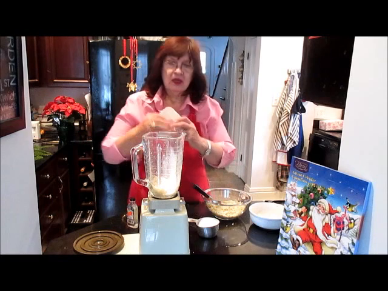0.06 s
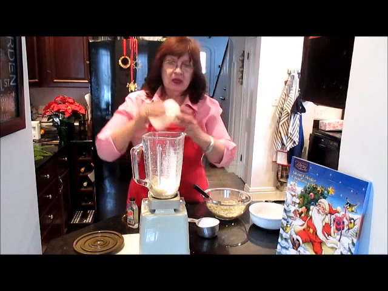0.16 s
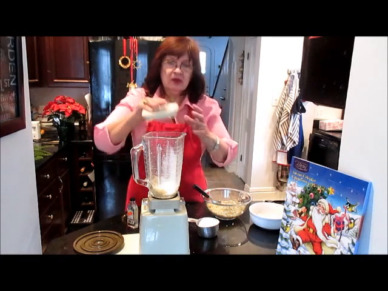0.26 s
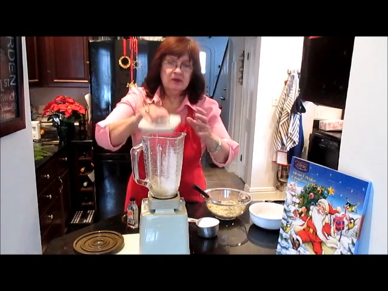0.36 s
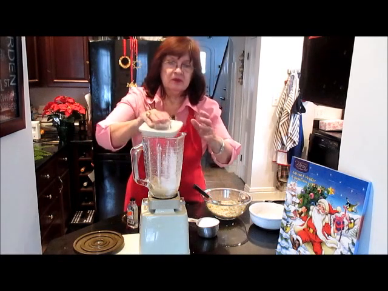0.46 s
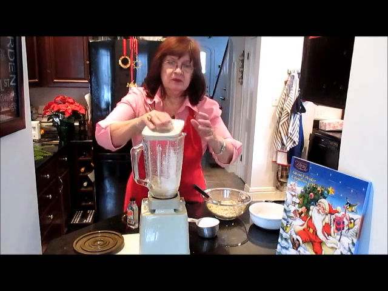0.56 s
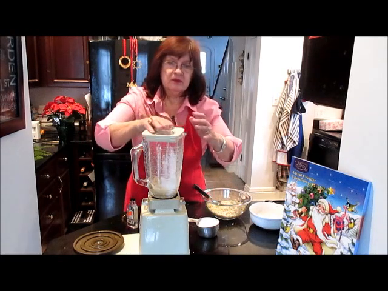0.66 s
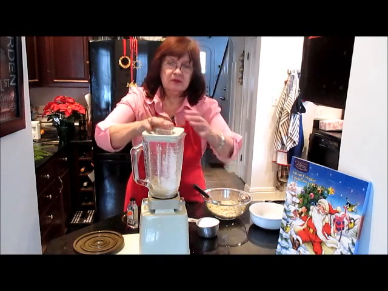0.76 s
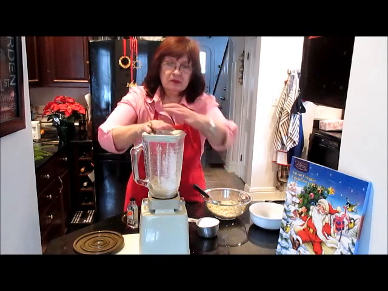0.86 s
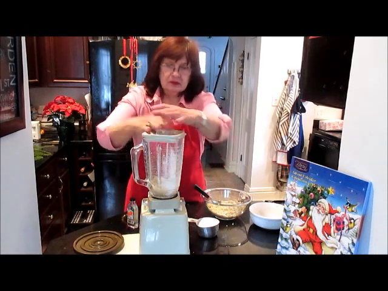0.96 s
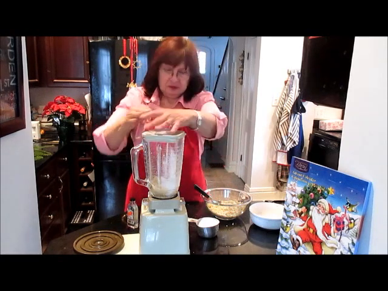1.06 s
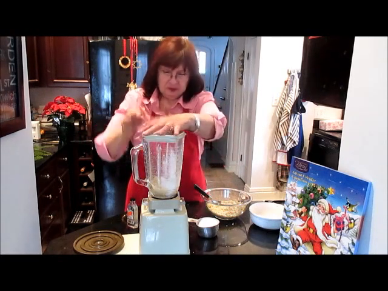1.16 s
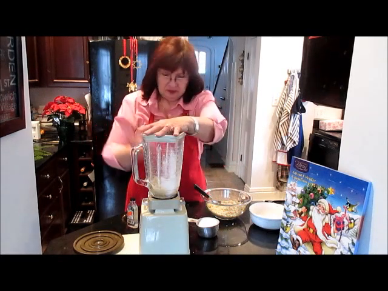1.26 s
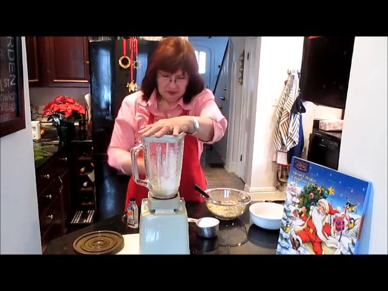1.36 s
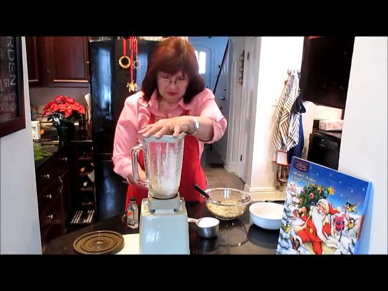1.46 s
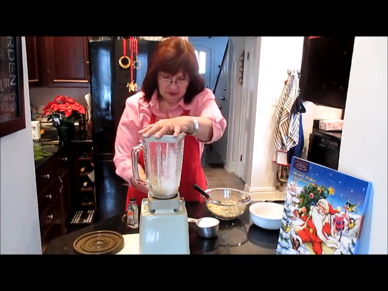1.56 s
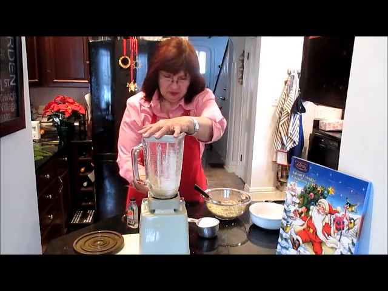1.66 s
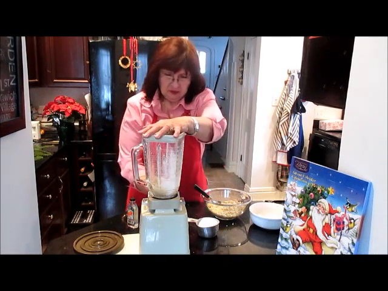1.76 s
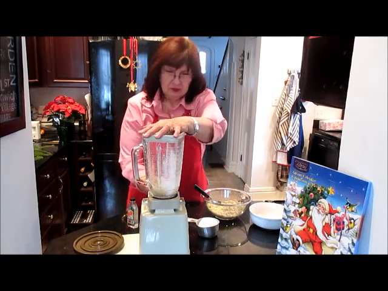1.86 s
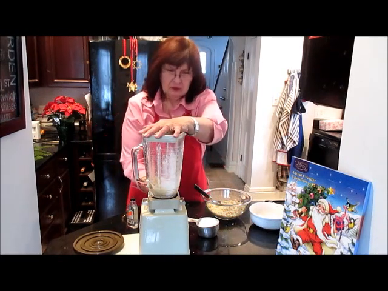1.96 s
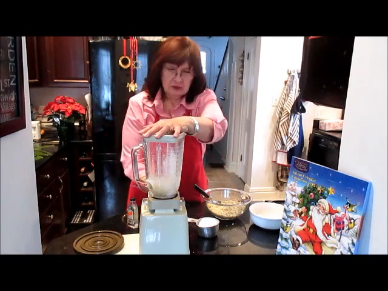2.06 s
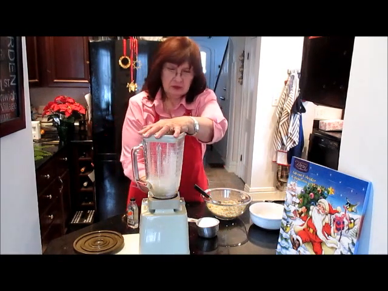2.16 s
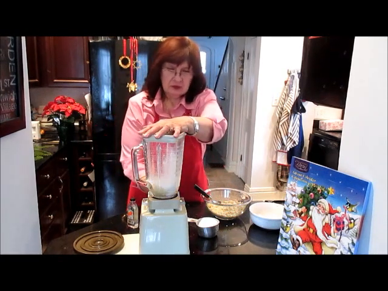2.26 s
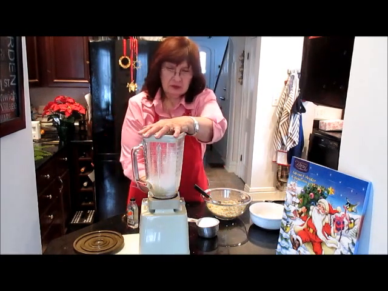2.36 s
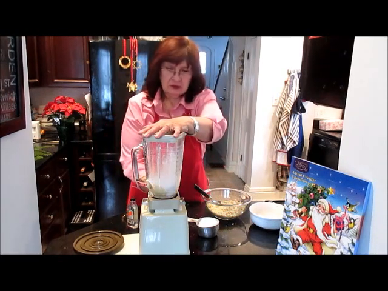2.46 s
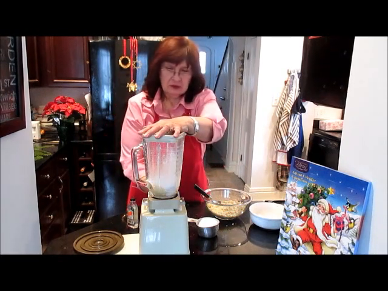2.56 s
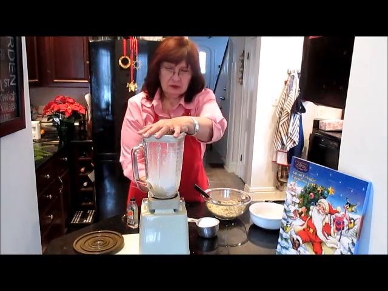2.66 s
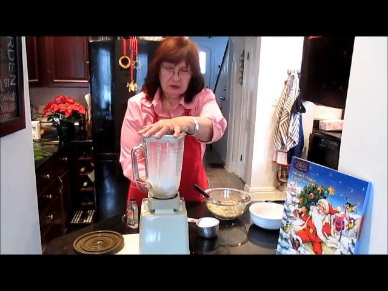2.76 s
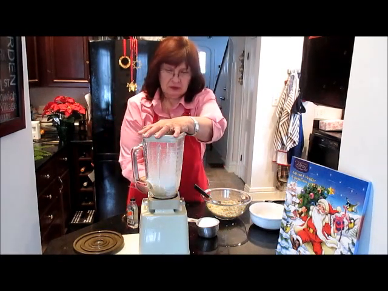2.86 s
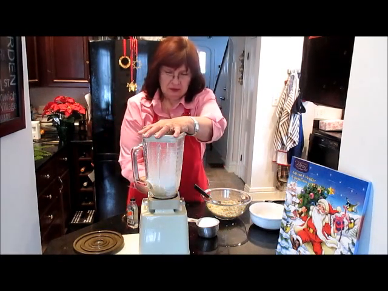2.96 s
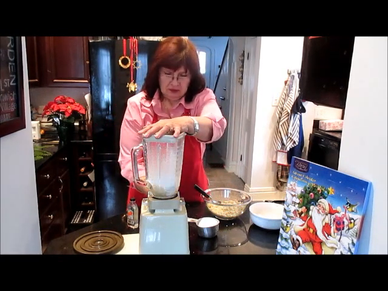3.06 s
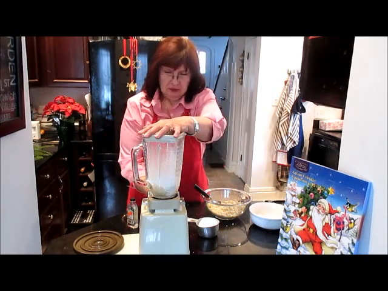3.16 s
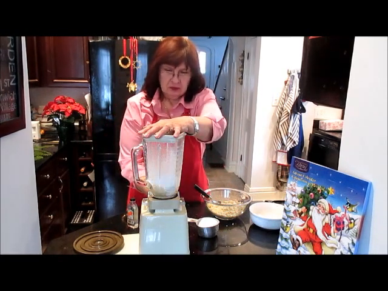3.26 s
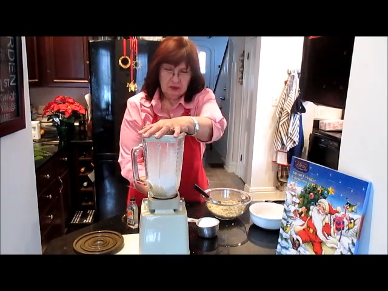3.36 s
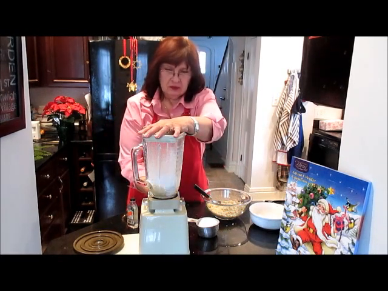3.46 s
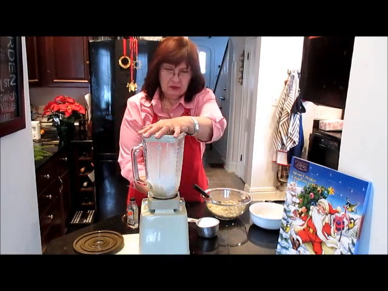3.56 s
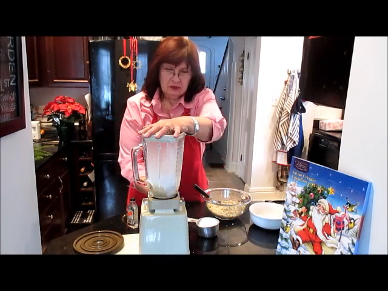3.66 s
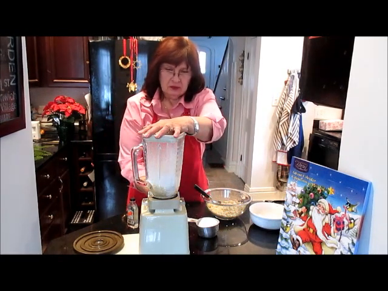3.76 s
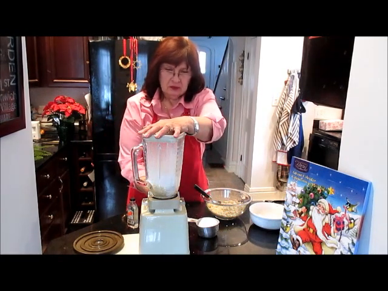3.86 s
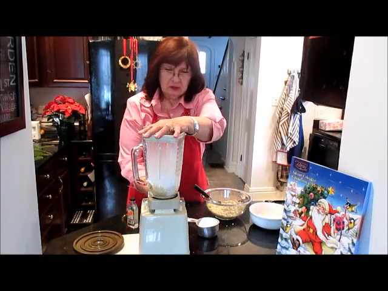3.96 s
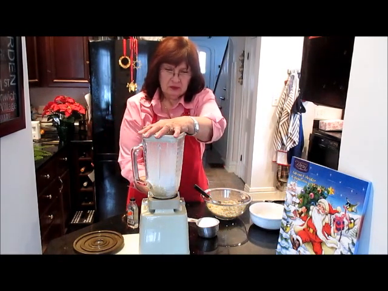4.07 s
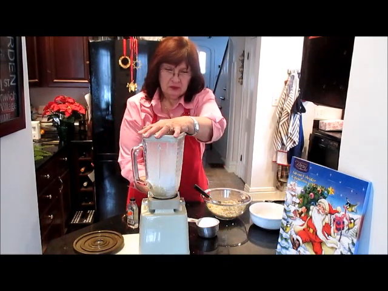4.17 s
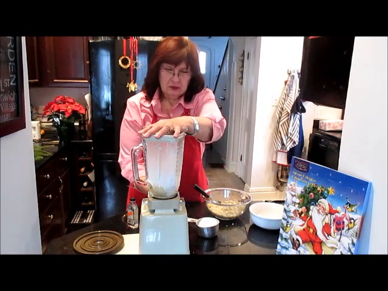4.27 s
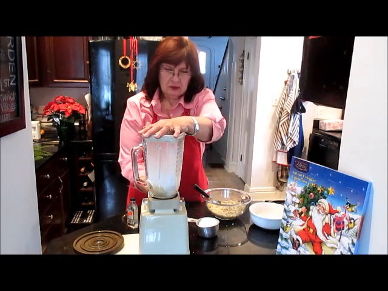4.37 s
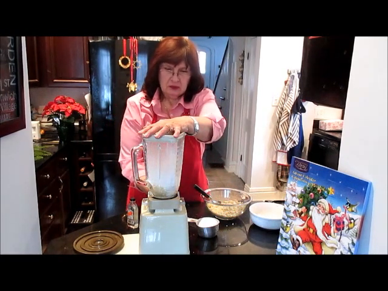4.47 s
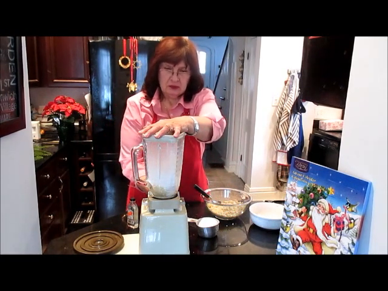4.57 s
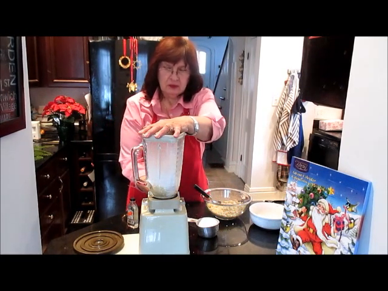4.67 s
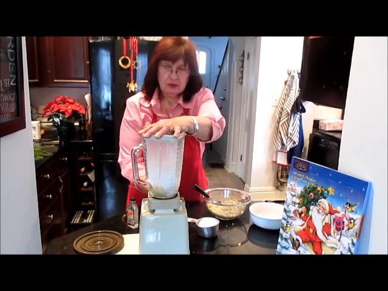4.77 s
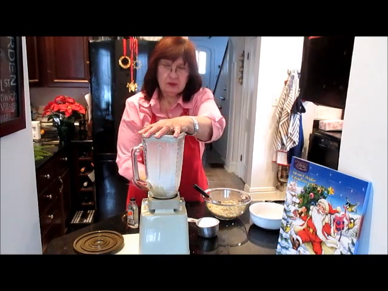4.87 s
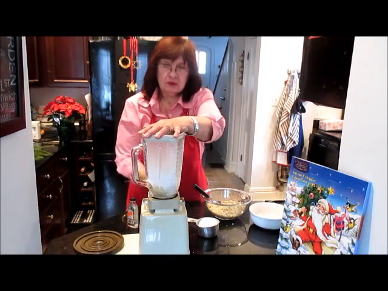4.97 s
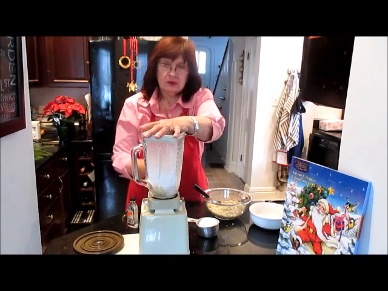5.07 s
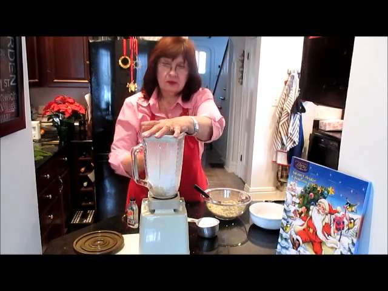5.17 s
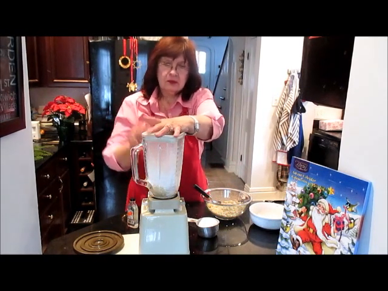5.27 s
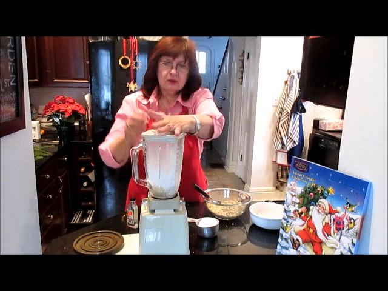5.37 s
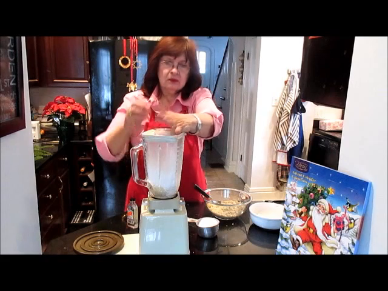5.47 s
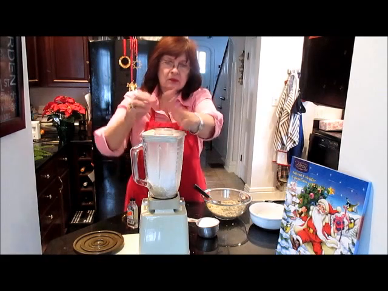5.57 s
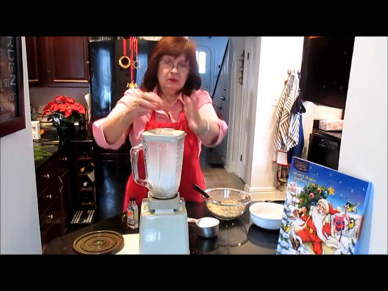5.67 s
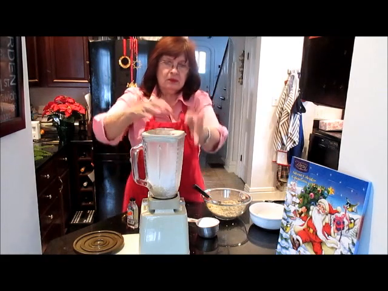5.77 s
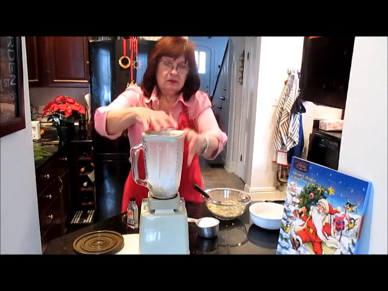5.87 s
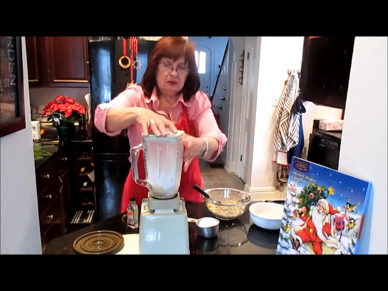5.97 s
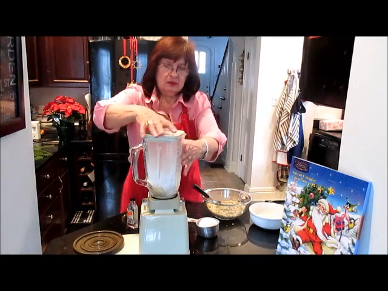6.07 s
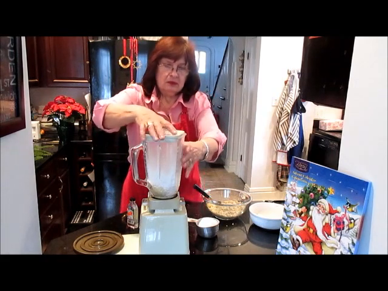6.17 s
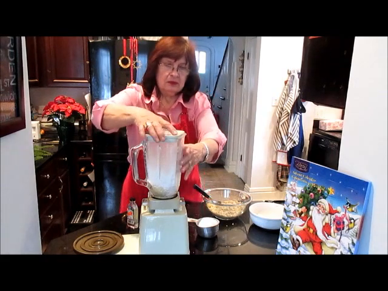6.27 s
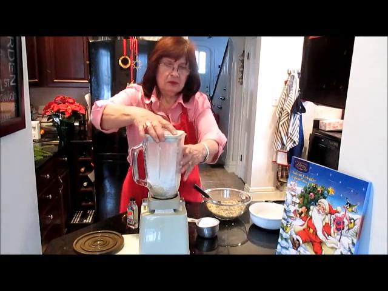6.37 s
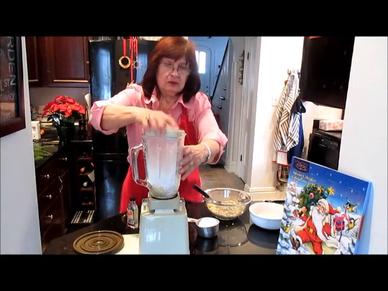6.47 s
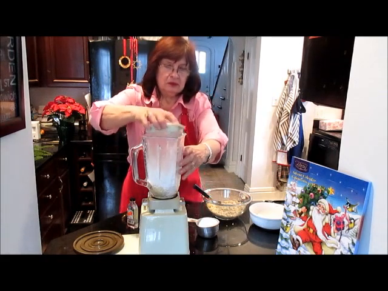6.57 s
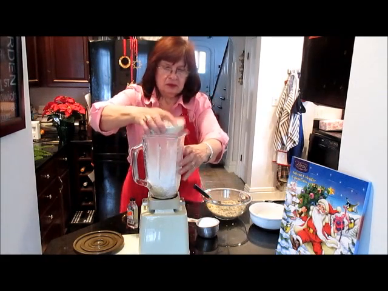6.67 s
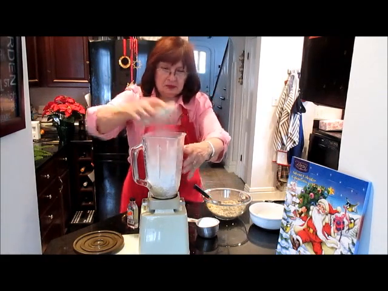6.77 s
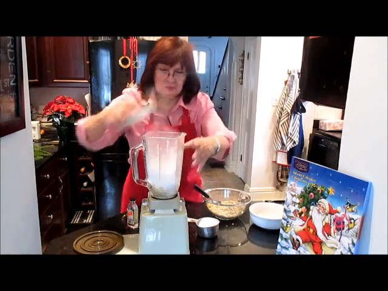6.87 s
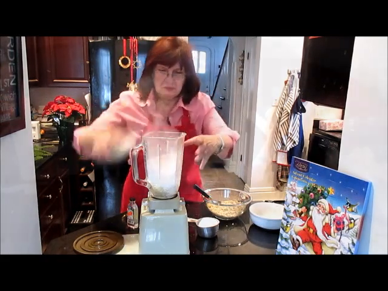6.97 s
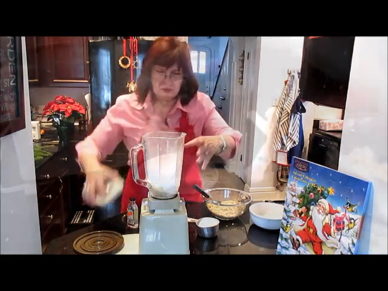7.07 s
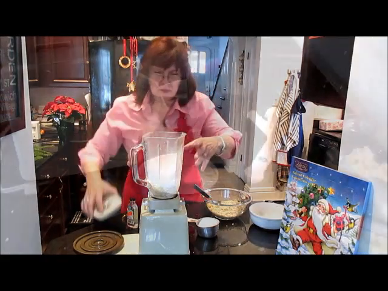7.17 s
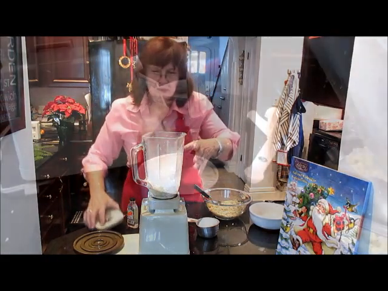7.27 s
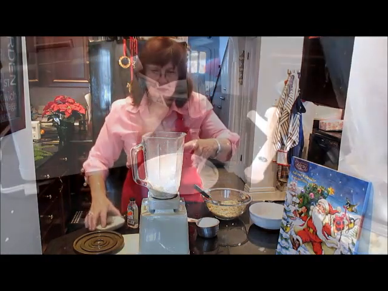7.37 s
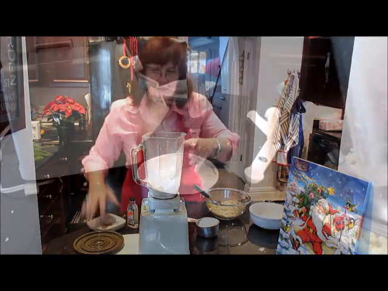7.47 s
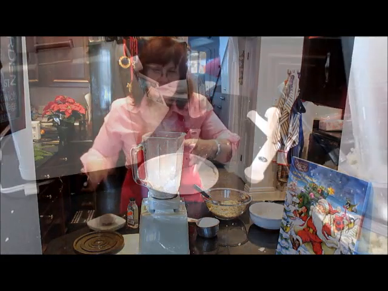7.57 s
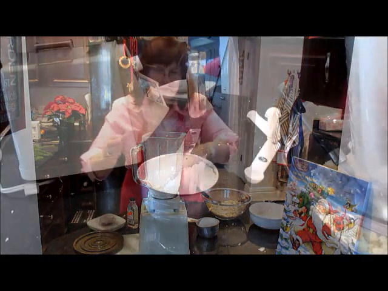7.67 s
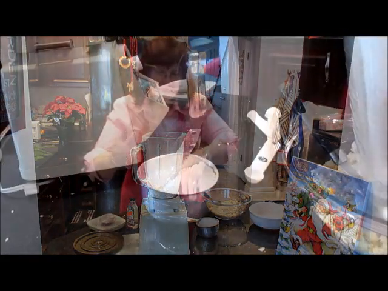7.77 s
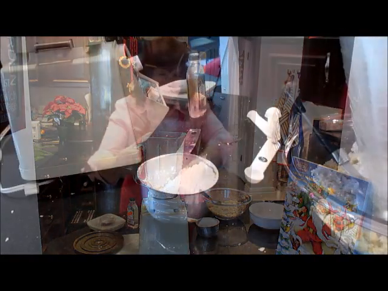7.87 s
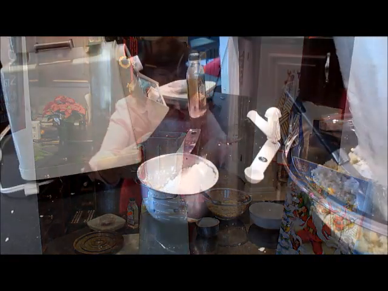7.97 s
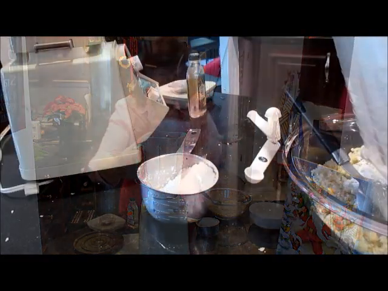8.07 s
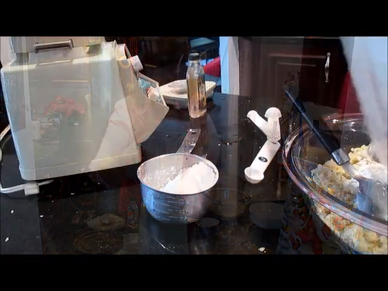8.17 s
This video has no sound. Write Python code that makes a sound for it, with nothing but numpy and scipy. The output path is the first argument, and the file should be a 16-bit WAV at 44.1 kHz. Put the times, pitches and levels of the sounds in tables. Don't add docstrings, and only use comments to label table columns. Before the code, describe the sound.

Faint lid handling, a sharp switch clack, a blender whines and grinds briefly, coasts down with ticking glass, then a lid slaps and a dish clatters.

```python
import sys
import numpy as np
from scipy import signal
from scipy.fft import rfft, irfft
from scipy.io import wavfile
from scipy.ndimage import uniform_filter1d

SR = 44100
rng = np.random.default_rng(int(sys.argv[2]) if len(sys.argv) > 2 else 0)


def inscribe(sig):
    pcm = np.round(np.clip(np.atleast_2d(sig).T, -1, 1) * 32767)
    wavfile.write(sys.argv[1], SR, pcm.astype(np.int16))


def natural_amplitude(level_db):
    exponent = np.asarray(level_db, float) / 20
    return 10 ** exponent


N = 362278

POWER_ON_S, POWER_OFF_S = 2.0, 4.584
TOP_HZ = 176.9
# (frequency [Hz], width [Hz], level [dB])
GLASS = [(5740, 22, 3), (6240, 25, -2.5), (6680, 15, 0), (7420, 70, -9), (7630, 120, -4), (8585, 160, -6.5),
         (9600, 310, -11), (11230, 130, -3), (12000, 60, -2), (12800, 130, -10), (13200, 150, -6),
         (13900, 120, -16)]


def evened(x):
    return x / np.sqrt(np.mean(x ** 2) + 1e-20)


def read(points, hz):
    f, value = np.transpose(points)
    return np.interp(np.log(hz + 1), np.log(f + 1), value)


def add(mix, s, sound):
    part = mix[round(s * SR):][:len(sound)]
    part += sound[:len(part)]


def wander(hz):
    return evened(np.interp(np.arange(N) * min(hz, 45) / SR, np.arange(400), rng.standard_normal(400)))


def coloured(x, gain):
    size = 2 ** 19
    return irfft(rfft(x, size) * gain(np.fft.rfftfreq(size, 1 / SR)))[:len(x)]


def peaks(modes, hz):
    return sum(natural_amplitude(db) / np.sqrt(1 + (2 * (hz - f) / w) ** 2) for f, w, db in modes)


def patchy(gain, patchy_db, flicker_db, size=512):
    frames, hz = 4 * N // size + 5, np.fft.rfftfreq(size, 1 / SR)
    a, b, patches = rng.standard_normal((frames, len(hz), 3)).T
    patches = uniform_filter1d(patches, size=6, axis=0)
    patches = evened(uniform_filter1d(patches, size=20, axis=1))
    z = (a + 1j * b) * natural_amplitude(patchy_db * patches + flicker_db * rng.standard_normal(frames))
    noise = signal.istft(z, nperseg=size, noverlap=3 * size // 4)[1][:N]
    return evened(coloured(noise, gain))


def ring(modes, lift_db=0., rise_ms=0.35):
    t = np.arange(SR // 2) / SR
    hz, db, t60 = np.transpose(modes)[:, :, None]
    damped = natural_amplitude(db + lift_db - 60 * t / t60) * np.sin(2 * np.pi * hz * t)
    x = damped.sum(0) * (1 - np.exp(-1000 * t / rise_ms))
    return x / abs(x).max()


def band_passed(x, lo_hz, hi_hz):
    band = signal.butter(2, np.clip([lo_hz, hi_hz], 50, 18000), "band", fs=SR)
    return signal.lfilter(*band, x)


def crack(ms, lo_hz, hi_hz, rise_ms=0.034):
    t = np.arange(6000) / SR
    envelope = np.exp(-1000 * t / ms) * (1 - np.exp(-1000 * t / rise_ms))
    x = band_passed(rng.standard_normal(6000) * envelope, lo_hz, hi_hz)
    return x / abs(x).max()


def shaft():
    spin_up_s, spin_up_bend = .165, 1.8
    creep_hz, creep_s = 9.5, .5
    stop_s, brake_bend, brake_lead_s = 6.585, .21, .04
    t = np.arange(N) / SR
    on = np.maximum(t - POWER_ON_S, 0)
    free = np.clip((t - POWER_OFF_S + brake_lead_s) / (stop_s - POWER_OFF_S + brake_lead_s), 0, 1)
    driven = TOP_HZ * (1 - .8 * np.exp(-(on / spin_up_s) ** spin_up_bend)) - creep_hz * np.exp(-on / creep_s)
    braked = driven * (1 - free) * (1 - brake_bend * free)
    hz = abs(uniform_filter1d(braked, size=1500)) * (on > 0)
    return hz, np.cumsum(hz * (1 + 0.0012 * wander(30))) / SR


def churning():
    # (time [s], level [dB])
    churn = [
        (2.1, 1),
        (2.31, 4),
        (2.55, 2),
        (2.86, -1),
        (3.3, 0),
        (3.88, 0.5),
        (4.5, 0),
        (5.6, 2.5),
        (6.4, -0.5),
    ]
    s, db = np.transpose(churn)
    return np.interp(np.arange(N) / SR, s, db)


def effort(speed_db, churn_db, full_db, lost_db, loss, power, churn):
    return full_db + lost_db * loss + power * speed_db + churn * churn_db


def start_jolt():
    jolt_db, jolt_s, wait_s = 11, 0.034, 0.021
    on = np.arange(N) / SR - POWER_ON_S - wait_s
    since = np.maximum(on, 0) / jolt_s
    return on, jolt_db * np.sqrt(since) * np.exp(.5 - .5 * since)


def blend(slow, fast, late):
    return np.sqrt(1 - slow) * fast + np.sqrt(slow) * late


def rumble():
    # (frequency [Hz], width [Hz], level [dB])
    housing = [(254, 22, -8), (330.4, 11.4, 2.5), (391.8, 27, 4), (463.4, 5.5, 1.5), (481, 20, -4.5),
               (521, 25, 3.5), (606, 13, 1)]

    def gain(hz):
        edges = (1 + (164 / (hz + 1)) ** 12) * (1 + (hz / 532) ** 12)
        return peaks(housing, hz) ** 1.62 / np.sqrt(edges)
    return patchy(gain, 1.2, 1.2, size=1024)


def whir(slow):
    # (frequency [Hz], density [dB per Hz])
    air_fast = [(320, -22), (550, -4), (646, -10), (871, -1.5), (1140, -3.5), (1490, -3), (1610, 0),
                (1870, -8), (2750, -2), (4200, -10), (5460, -51), (9240, -120)]
    # (frequency [Hz], density [dB per Hz])
    air_late = [(320, -42), (550, -14), (658, -13), (827, -3.5), (981, -0.5), (1270, -6), (1380, -4.5),
                (1870, -5), (2040, -3), (2820, -12), (3510, -23), (4200, -24), (5460, -15), (9240, -120)]
    # (frequency [Hz], width [Hz], lift [dB])
    cavities = [(874, 160, 3.5), (1640, 36, -15), (1986, 230, 7.5), (2400, 46, -14), (2560, 250, -2.5)]
    fast = patchy(lambda hz: natural_amplitude(read(air_fast, hz)) * (1 + peaks(cavities, hz)), 1.0, 0.71)
    late = patchy(lambda hz: natural_amplitude(read(air_late, hz)), 0.95, 2.1)
    return blend(slow, fast, late)


def crumb_skids(sweep):
    skid_s, hits_per_s = 0.0016, 900
    size = natural_amplitude(6.6 * np.minimum(rng.exponential(1, N), 3))
    clicks = size * (rng.random(N) < hits_per_s / SR * sweep)
    skid = np.exp(-np.arange(400) / SR / skid_s)
    return signal.oaconvolve(clicks, skid)[:N] * rng.standard_normal(N)


def grind_and_spray(slow, turns):
    # (frequency [Hz], density [dB per Hz])
    grind_fast = [(1940, -50), (3300, -3), (3590, -24), (3790, -5.5), (4680, -1), (5050, -4), (5610, 0.5),
                  (6320, 1.5), (6850, -2), (7550, -6), (8250, -8), (9500, -17.5), (12400, -45),
                  (20900, -120)]
    # (frequency [Hz], density [dB per Hz])
    grind_late = [(1940, -25), (3300, 1.5), (3650, -12), (4520, 4.5), (5180, -9), (5970, 5), (6790, -4),
                  (7550, -5), (9090, -15), (9500, -18), (12400, -47), (20900, -120)]
    # (frequency [Hz], density [dB per Hz])
    spray_air = [(5000, -50), (8500, 0), (10300, 8), (11700, -4)]
    depth = np.clip(0.012 + 0.3 * slow, 0, 1)
    sweep = 1 + depth * np.cos(2 * np.pi * turns + 0.63 * wander(20.0))
    clicks = crumb_skids(sweep)
    treble = []
    for colour, between, share in ((grind_fast, .8, .3), (grind_late, .9, .6), (spray_air, .3, .3)):
        gain = lambda hz: natural_amplitude(read(colour, hz)) * (between + peaks(GLASS, hz))
        steady = patchy(gain, 1.0, 2.35, size=256)
        treble.append(evened(sweep * (steady + share * evened(coloured(clicks, gain)))))
    fast, late, spray = treble
    return blend(slow, fast, late), spray


def motor(state, turns):
    # (full-speed level [dB], change without current [dB], power of speed [1], churn share [1], slop share [1])
    noise_layers = [
        (-26.5, 4, 0.62, 0.67, 0.68),
        (-18.5, -2.5, 1, 0.086, 0.98),
        (-24, -6.5, 0.96, 1.6, 0.81),
        (-33.5, -6.5, 1.22, 1.1, 3.3),
    ]
    # (time [s], lift [dB])
    slops = [
        (2.01, 7.3),
        (4.977, 3.4),
        (5.42, 3.4),
        (6.487, 6.3),
    ]
    slop_s, loss_s = 0.028, 0.13
    t = np.arange(N) / SR
    slow = np.clip((t - POWER_OFF_S) / 1.2, 0, 1)
    on, jolt_db = start_jolt()
    low = rumble() * np.clip(on / .012, 0, 1) * natural_amplitude(jolt_db)
    air = whir(slow) * natural_amplitude(0.31 * jolt_db)
    grind, spray = grind_and_spray(slow, turns)
    loss = 1 - np.exp(-np.maximum(t - POWER_OFF_S, 0) / loss_s)
    slop_db = sum(db * (t > s) * np.exp(-np.maximum(t - s, 0) / slop_s) for s, db in slops)
    out = np.zeros(N)
    sounds = (natural_amplitude(-4.0) * low, natural_amplitude(-3.0) * air, grind, spray)
    for (full_db, lost_db, power, churn, slop), x in zip(noise_layers, sounds):
        out += natural_amplitude(effort(*state, full_db, lost_db, loss, power, churn) + slop * slop_db) * x
    return (t > 2.008) * out


def dips(hz):
    # (frequency [Hz], width [Hz], depth [0-1])
    dead_spots = [(498, 13, 0.8), (410, 30, 0.5), (1663, 40, 0.7), (1460, 45, .3), (1254, 68, 0.3),
                  (1768, 14, 0.26), (960, 46, 0.4), (775, 85, .7)]
    notches = [1 - np.clip(depth, 0, 1) / (1 + (2 * (hz - f) / w) ** 2) for f, w, depth in dead_spots]
    return np.prod(notches, axis=0)


def whine(state, turns):
    # (multiple of shaft speed [1], powered level [dB], coasting level [dB])
    orders = [(1, -17.5, -13.5), (1.5, -22, -29), (2, -14.5, 0), (2.5, -12.5, -53), (3, -5, 3),
              (4, -15.5, -8.5), (5, -5, -21), (6, -6.5, -33), (7, -7, -15), (8, -11, -21), (9, -12.5, -22),
              (10, -5.5, -2), (11, -42, -16), (13, -12, -39), (14, -14, -29), (15, -13, -15.5),
              (16, -11, -9.5), (20, -11.5, -20)]
    # (full-speed level [dB], change once free [dB], delay [s], power of speed [1], churn share [1])
    tone_groups = [
        (-25.5, -10.5, 0.17, 2.2, 0.58),
        (-25.5, -1.5, 0.11, 2.5, 0.11),
    ]
    # (multiple of shaft speed [1], level [dB])
    sidebands = [(1, -24), (2, -9)]
    # (frequency [Hz], width [Hz], lift [dB])
    lifts = [(325, 35, 3), (516, 3.8, -1), (1588, 14.6, 12), (1713, 26, 0.5), (2540, 28, 4), (253, 20, -1),
             (454, 24, 5), (1674, 21, 0), (1690, 30, -10), (864, 14, -0.5), (2584, 12, 16)]
    mains_beat_hz, loss_s, break_up_db = 118.8, 0.083, 1.2
    t = np.arange(N) / SR
    coasting = np.clip((t - POWER_OFF_S) / 0.063, 0, 1)
    levels = []
    for full_db, lost_db, wait, power, churn in tone_groups:
        loss = 1 - np.exp(-np.maximum(t - POWER_OFF_S - wait, 0) / loss_s)
        levels.append(effort(*state, full_db, lost_db, loss, power, churn))
    low_db, high_db = levels
    tones = np.zeros(N)
    for k, on, off in orders:
        level = (low_db if k < 4.5 else high_db) + on + (off - on) * coasting
        waver = (1.5 + break_up_db * coasting) * wander(14)
        tones += natural_amplitude(level + waver) * np.cos(2 * np.pi * (k * turns + rng.random()))
    for k, db in sidebands:
        beat = np.cos(2 * np.pi * (k * turns + mains_beat_hz * t))
        tones += (1 - coasting) * natural_amplitude(low_db + db + 3.5 * wander(15)) * beat
    return coloured(tones, lambda hz: (1 + peaks(lifts, hz)) * dips(hz))


def ticks():
    # (time [s], peak [dB], brightness [dB])
    bits = [(4.9497, -25, -15), (4.979, -4.5, -30), (5.356, -8, -27), (5.3963, -8, -16), (5.418, -10, -25),
            (5.3184, -11.5, -20), (5.368, -12, -17), (5.407, -11, -18), (5.427, -7, -20), (5.441, -13, -20),
            (5.451, -19, -20), (5.485, -11, -18), (5.497, -10, -18), (5.555, -23, -18), (5.569, -16, -18),
            (5.647, -19, -20), (5.69, -21, -26), (5.731, -24, -22), (5.8058, -27, -18), (5.9605, -22, -24),
            (5.98, -24, -24), (6.062, -19, -22), (6.2145, -22, -18), (6.3546, -34, -22), (6.39, -41, -24),
            (4.846, -10, -27), (4.8949, -11, -18), (4.9213, -20, -20), (5.1782, -13, -22),
            (5.471, -12, -18), (5.5425, -7.5, -16), (5.5802, -13, -12), (5.6056, -13.5, -13),
            (5.6185, -10.5, -16), (5.7135, -10.5, -21), (5.8418, -10, -20.5), (5.931, -15.5, -19),
            (6.04, -14.5, -27), (6.1038, -23, -29), (6.1446, -22, -27), (6.1754, -16, -27),
            (6.2076, -26, -19), (6.254, -16, -22), (6.3191, -27, -23), (6.3769, -32, -27),
            (6.4862, -36, -16), (0.068, -32, -30), (4.5794, -10, -5.5), (8.105, -13.5, -14),
            (0.0558, -31, -21), (0.077, -27, -23), (7.5143, -29, -29)]
    out = np.zeros(N)
    for s, peak_db, bright_db in bits:
        body = crack(3.9, 3700, 7200, 1.0)
        bright = crack(3.7, 5500, 14400, 0.88)
        add(out, s, natural_amplitude(peak_db - 9.5) * (body + natural_amplitude(bright_db + 9.5) * bright))
    return coloured(out, lambda hz: 1.02 + peaks(GLASS, hz))


def touches():
    # (time [s], tick level [dB], base thud level [dB])
    contacts = [(0.475, -40, -28), (0.501, -28, -30), (0.6116, -29, -28), (0.6394, -30, -26.5),
                (0.6593, -28, -31), (0.704, -31, -30.5), (0.883, -33, -39), (0.981, -29.5, -36),
                (1.411, -27, -24), (2.0164, -8.5, -18), (4.5776, -2.5, -12), (6.6722, -54, -61),
                (8.1073, -10.5, -12), (8.1501, -27, -23), (8.1914, -26, -24), (1.834, -32, -46),
                (6.487, -35, -42), (1.866, -32.5, -40), (1.97, -37, -42.5), (7.376, -34, -70)]
    # (frequency [Hz], level [dB], t60 [s])
    base = [(355, -6.5, 0.15), (417, -1.5, 0.076), (450, 5, 0.066), (473.3, -1.5, 0.16), (518, 2.5, 0.1)]
    out = np.zeros(N)
    for s, tick_db, thud_db in contacts:
        uneven_db = 4.7 * rng.standard_normal((len(base), 1))
        add(out, s, natural_amplitude(thud_db + 1.5) * ring(base, uneven_db, rise_ms=3.4))
        add(out, s, natural_amplitude(tick_db - 4) * crack(8.9, 800, 3640))
    return out


def rim_taps():
    # (frequency [Hz], level [dB], t60 [s])
    rim_low = [(1597, 12, 0.26), (1106, 10, 0.056)]
    rim_middle = [(2810, 3, 0.16), (4500, -21, .08), (4330, -10, .05)]
    rim_high = [(3310, 23, 0.12), (3520, -26, .05)]
    # (low modes [dB], middle modes [dB], high modes [dB])
    spots = [
        (1, -10, -1.5),
        (1.5, -13, -18),
        (-24, -3, -18),
    ]
    # (time [s], level [dB])
    blows = [
        [(0.5013, -53.5), (0.6114, -54), (2.0183, -37.5), (6.6722, -61), (8.1065, -49)],
        [(0.6394, -55), (0.6594, -46.5), (0.7048, -46), (0.864, -60), (8.1918, -50)],
        [(4.5794, -29), (7.377, -48)],
    ]
    out = np.zeros(N)
    for taps, spot_db in zip(blows, spots):
        rim = sum(natural_amplitude(db) * ring(modes) for db, modes in zip(spot_db, (rim_low, rim_middle, rim_high)))
        for s, db in taps:
            add(out, s, natural_amplitude(db + 13.5) * rim)
    return out


def counter_knocks():
    # (time [s], peak [dB], frequency [Hz])
    bumps = [
        (0.716, -36, 195),
        (0.932, -28, 140),
        (0.985, -28.5, 125.6),
        (7.547, -25, 131),
    ]
    # (time [s], peak [dB], frequency [Hz], t60 [s])
    knocks = [(7.846, -31.5, 680, .12), (8.152, -30, 980, .03), (8.19, -25, 940, .04),
              (8.152, -22, 520, 0.045), (2.02, -13, 470, 0.077), (2.088, -13, 483, .1),
              (2.128, -12.5, 446, .06), (2.152, -14.5, 470, .07), (2.182, -15, 490, 0.084),
              (2.24, -15.5, 440, 0.11), (2.3, -13.5, 470, .06), (7.56, -18, 1925, 0.092),
              (7.448, -28.5, 690, 0.21)]
    out = np.zeros(N)
    for s, peak_db, hz in bumps:
        add(out, s, natural_amplitude(peak_db) * ring([(hz, 0, .1)], rise_ms=0.48))
    for s, peak_db, hz, t60 in knocks:
        add(out, s, natural_amplitude(peak_db) * ring([(hz, 0, t60)], rise_ms=3.2))
    return out


def switch():
    # (frequency [Hz], level [dB], t60 [s])
    plate = [(940, 7, 0.15), (1286, 9, 0.11), (1650, -1, 0.15), (1870, -3, 0.15), (2250, -18, .08)]
    # (time [s], peak [dB])
    closures = [
        (2.018, -26),
        (2.055, -17),
        (2.079, -13),
    ]
    out = np.zeros(N)
    for s, peak_db in closures:
        uneven_db = 1.6 * rng.standard_normal((len(plate), 1))
        add(out, s, natural_amplitude(peak_db) * ring(plate, uneven_db, rise_ms=1.6))
    return out


def finger_ring():
    # (frequency [Hz], level [dB], t60 [s])
    glass_modes = [(470, 16, 0.094), (1310, 13, 0.044), (1960, 15, 0.081), (2700, 0, 0.19),
                   (2960, -6, 0.37), (3332, -4, 0.22), (5540, 32, 0.028), (6050, -4, 0.52),
                   (6850, -20, 0.26), (10200, 10, 0.04), (13600, 5, 0.02)]
    # (time [s], peak [dB])
    strikes = [
        (1.234, -17),
    ]
    out = np.zeros(N)
    for s, peak_db in strikes:
        add(out, s, natural_amplitude(peak_db) * ring(glass_modes))
        add(out, s, natural_amplitude(peak_db - 9.5) * crack(9.4, 570, 6400))
    return out


def lid_slap():
    # (frequency [Hz], level [dB], t60 [s])
    lid = [(1046, 10, 0.018), (1040, -32, 0.15), (1880, 5, 0.011), (2200, -8, 0.019), (3170, -12, 0.026),
           (3380, -13, 0.049), (5900, -21, 0.013), (7500, -18, 0.013)]
    # (time [s], peak [dB])
    slaps = [
        (7.399, 1),
    ]
    out = np.zeros(N)
    for s, peak_db in slaps:
        add(out, s, natural_amplitude(peak_db) * ring(lid, rise_ms=2.0))
        add(out, s, natural_amplitude(peak_db - 14.5) * crack(1.9, 1250, 7800))
        add(out, s, natural_amplitude(peak_db - 21.5) * crack(33.0, 1000, 2800))
    return out


def dish_clatter():
    # (frequency [Hz], t60 [s], rim-struck level [dB], foot-struck level [dB], flat-struck level [dB])
    dish = [(272, 0.087, -22, 11, 1), (380, 0.082, -6, 3, -2.5), (704, 0.17, -4, 6, -4.5),
            (864, 0.09, -15.5, 3, -3), (925.6, 0.15, -22, 0, -15), (1120, 0.13, -20, 3, -14),
            (1245, .13, -23, -17, -14), (1598, 0.35, 5, 6, -1.5), (1944, 0.17, -10, -16, -3),
            (1874, 0.088, -16, 5, 1), (2140, 0.069, -14, -7, 1.5), (2790, 0.17, -4, -32, -24),
            (3340, 0.11, -2, -8, -5), (3524, 0.063, -10, -5, 3), (5360, 0.18, -32, -30, -23),
            (7540, 0.091, -31.5, -34, -26), (7970, 0.11, -34, -32, -25), (10200, 0.075, -36, -42, -26)]
    # (time [s], peak [dB], chatter [dB])
    blows = [
        [(7.446, -12, -8)],
        [(7.544, -18, 4.5), (7.552, -6, -6.5), (7.846, -31.5, 7)],
        [(7.714, -1.5, -3), (7.749, -15, 2.5)],
    ]
    out = np.zeros(N)
    hz, t60, *spots_db = np.transpose(dish)
    for hits, spot_db in zip(blows, spots_db):
        modes = np.transpose([hz, spot_db, t60])
        for s, peak_db, chatter_db in hits:
            add(out, s, natural_amplitude(peak_db - 5) * ring(modes))
            add(out, s, natural_amplitude(peak_db - 44) * crack(1.5, 600, 5800))
            add(out, s, natural_amplitude(peak_db + chatter_db) * crack(5.2, 560, 1470))
    return out


def rubs():
    # (start [s], end [s], starting level [dB], change [dB/s])
    strokes = [
        (.03, .2, -49.5, -68),
        (0.458, 0.702, -61, 40),
        (.72, 1.12, -63, -38),
        (1.24, 1.5, -50, -39),
        (1.56, 1.998, -74, 39),
        (8.108, 8.21, -34, -70),
    ]
    # (frequency [Hz], density [dB per Hz])
    friction = [(150, -32), (250, 1), (458, -44), (664, -2.5), (1470, -2), (1620, -2), (1890, -6),
                (2830, -8.5), (14000, -67)]
    slips = rng.standard_normal(N) * natural_amplitude(3.7 * wander(45)) * (0.42 + 2.0 * (rng.random(N) < .02))
    slips = evened(coloured(slips, lambda hz: natural_amplitude(read(friction, hz))))
    t = np.arange(N) / SR
    envelope = np.zeros(N)
    for a, b, db, db_per_s in strokes:
        fades = np.clip((t - a) / 0.012, 0, 1) * np.clip((b + 0.063 - t) / 0.075, 0, 1)
        envelope += natural_amplitude(db + db_per_s * np.clip(t - a, 0, b - a)) * fades
    return slips * envelope


def rustles():
    # (start [s], end [s], level [dB], low edge [Hz], high edge [Hz])
    swishes = [(.86, 1.08, -62, 1990, 6500), (1.582, 1.63, -60, 500, 1300), (.24, .255, -57, 7500, 10500),
               (1.09, 1.19, -67, 11000, 15500), (1.58, 1.758, -68, 5050, 5400),
               (1.583, 1.72, -61, 1900, 3200), (1.87, 1.99, -62, 1800, 4500),
               (1.962, 1.975, -66, 10000, 11000), (7.514, 7.522, -47, 2500, 8000)]
    out = np.zeros(N)
    for a, b, db, lo_hz, hi_hz in swishes:
        grain = rng.standard_normal(SR // 2) * natural_amplitude(4.4 * wander(38)[:SR // 2])
        size = int((b - a) * SR)
        swish = evened(band_passed(grain, lo_hz, hi_hz))[:size]
        add(out, a, natural_amplitude(db) * swish * np.sqrt(np.hanning(size)))
    return out


def kitchen(x):
    # (frequency [Hz], t60 [s])
    decay = [(125, 0.66), (500, 0.41), (2000, 0.48), (6000, 0.38), (14000, 0.39)]
    taps = np.zeros(SR // 2)
    at = np.arange(200, len(taps) - 20, 20)
    taps[at + rng.integers(0, 20, len(at))] = rng.choice([-1., 1.], len(at))
    hz, t, z = signal.stft(taps, SR, nperseg=256)
    fall = natural_amplitude(-60 * t / read(decay, hz)[:, None])
    tail = signal.istft(z * fall, SR, nperseg=256)[1]
    return signal.fftconvolve(x, tail / np.linalg.norm(tail))[:N]


def background():
    # (frequency [Hz], density [dB per Hz])
    air_floor = [(12, -49), (20, -20), (43, -6.5), (86, -10.5), (123, -9), (187, -9.5), (210, -20.5),
                 (293, -10.5), (367, -18.5), (660, -22), (718, -21), (1810, -32.5), (1960, -32),
                 (8650, -42), (16000, -50)]
    # (peak time [s], level [dB], rise [dB/s], fall [dB/s])
    swells = [
        (.94, -34, 85, 130),
        (2.15, -43, 54, 70),
        (4.28, -32, 18.5, 31),
        (5.46, -36.5, 38, 4.5),
        (8.21, -59, 37, 30),
    ]
    air_db, drone_db = -45.5, -47.5
    air = natural_amplitude(air_db - 1.5) * patchy(lambda hz: natural_amplitude(read(air_floor, hz)), 1.3, 0.8, size=1024)

    def drone_gain(hz):
        modes = [(61.4, 16.0, -3.5), (89.0, 6.1, -3)]
        return peaks(modes, hz) ** 2 / (1 + (45 / (hz + 1)) ** 8)
    drone = patchy(drone_gain, 0., 0., size=1024)
    t = np.arange(N) / SR
    swell = natural_amplitude(drone_db)
    for s, db, rise, fall in swells:
        swell = swell + natural_amplitude(db - np.maximum(rise * (s - t), fall * (t - s)))
    return air + natural_amplitude(-8.0) * swell * drone


def scene():
    speed, turns = shaft()
    state = 20 * np.log10(speed / TOP_HZ + 0.00045), churning()
    tones = whine(state, turns)
    handling = touches() + rim_taps() + counter_knocks() + switch() + finger_ring()
    hits = ticks() + handling + lid_slap() + dish_clatter() + rubs() + rustles()
    wet = kitchen(natural_amplitude(-8.5) * hits + natural_amplitude(-15.0) * tones)
    return (motor(state, turns) + hits + tones + wet + background())[None]


def top_cut(x):
    return signal.sosfilt(signal.butter(12, 16540, fs=SR, output="sos"), x)


def record(dry):
    edge_hz = 15760
    low_pass = signal.firwin(1201, edge_hz, window=("kaiser", 9), fs=SR)
    limited = signal.oaconvolve(np.clip(dry, -1, 1), low_pass[None], "same")
    return top_cut(limited)


dry = scene()
out = record(dry)
inscribe(out)
```